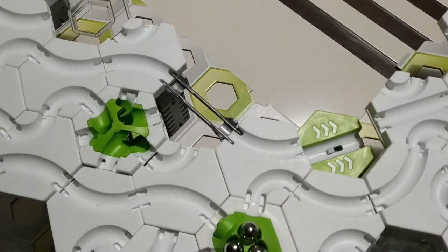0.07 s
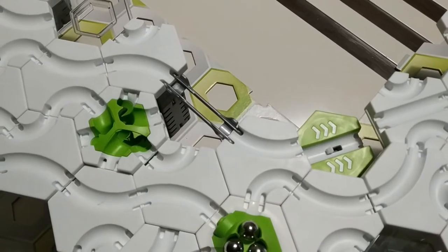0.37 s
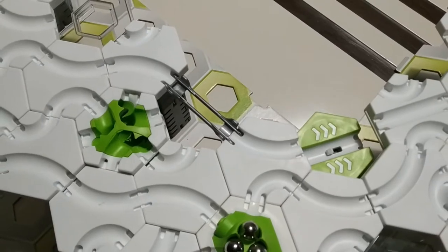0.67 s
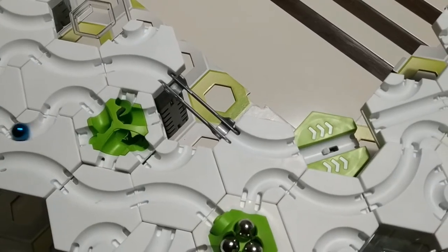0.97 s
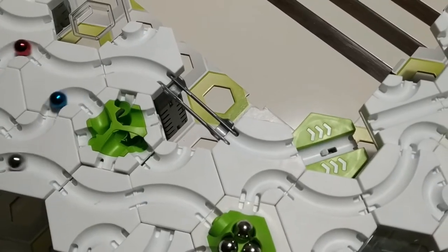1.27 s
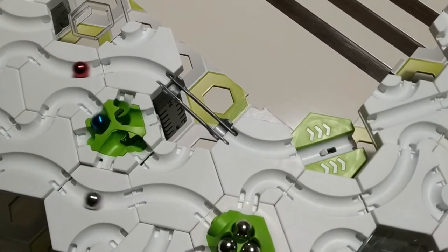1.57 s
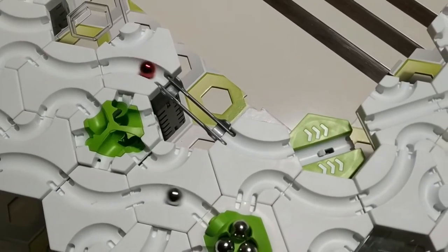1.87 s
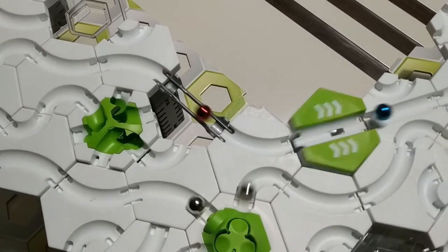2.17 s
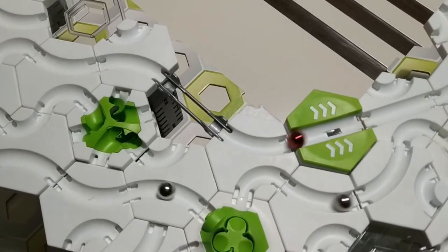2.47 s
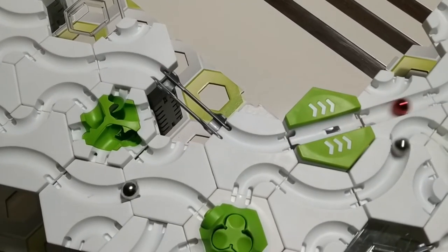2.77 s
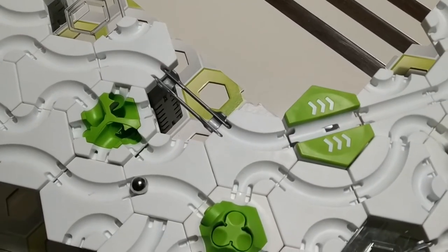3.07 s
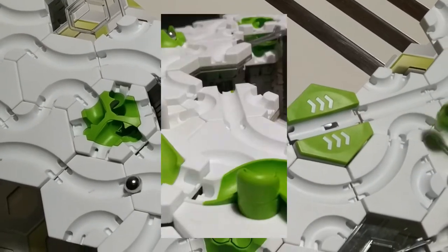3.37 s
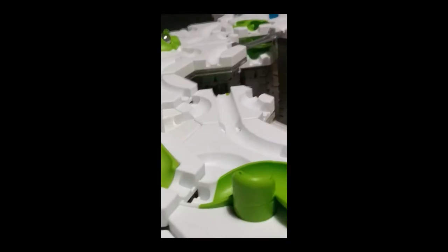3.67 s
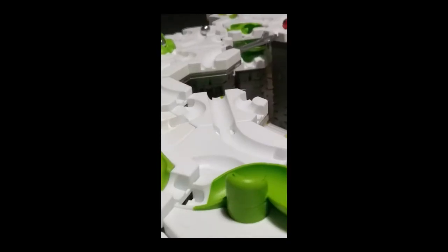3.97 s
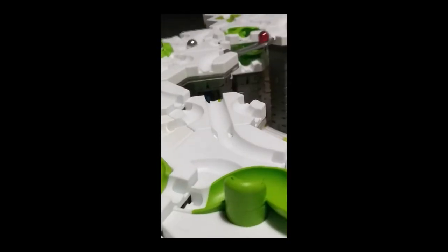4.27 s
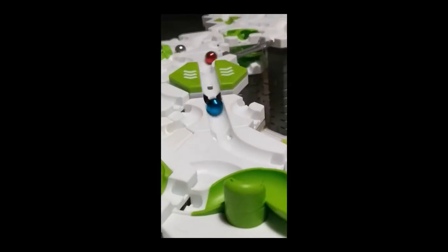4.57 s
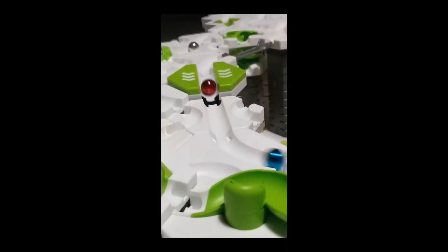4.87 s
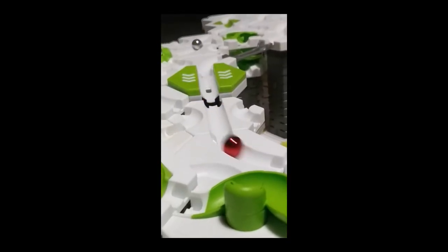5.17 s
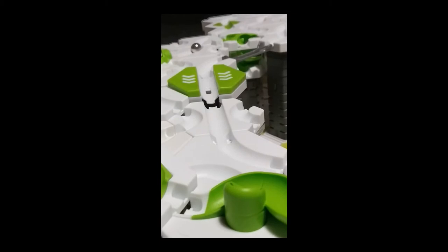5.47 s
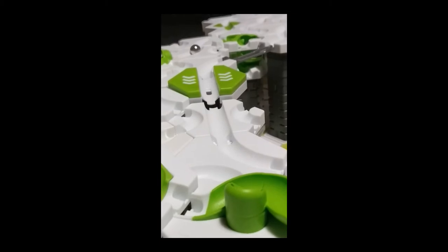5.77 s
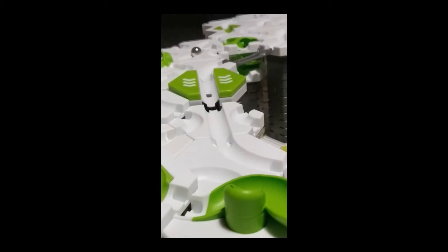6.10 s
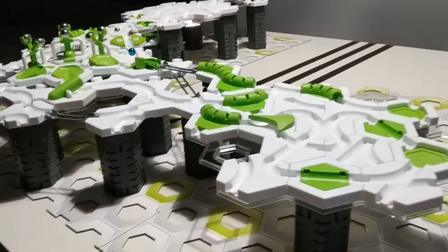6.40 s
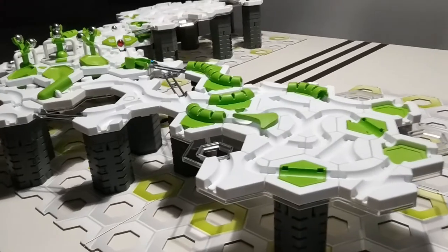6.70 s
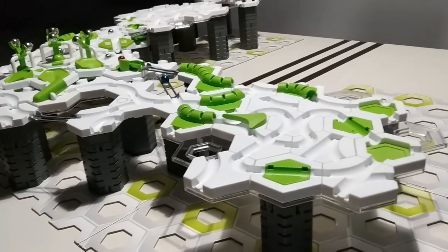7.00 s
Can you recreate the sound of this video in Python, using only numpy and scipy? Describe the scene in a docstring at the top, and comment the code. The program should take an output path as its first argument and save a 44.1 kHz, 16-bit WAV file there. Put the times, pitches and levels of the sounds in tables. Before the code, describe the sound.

In a small, quiet room, marbles roll along plastic grooves near the microphone, rumbling softly and clicking across joints and switches. The clatter thickens as one rings briefly down metal rails and others knock onto lower tiles. Then the sound suddenly turns softer and drier: a marble snaps against a magnetic launcher, jolting the table, and irregular ticks carry on over faint rolling.

```python
"""A table in a quiet room, where steel marbles run through a plastic toy track. They rumble in the grooves,
click over tile joints and switches, and thud down onto lower tiles; one chatters down a pair of metal rails and
sets them ringing. At 3.46 s the scene changes to a quieter stretch of the track, where a marble jolts a
magnetic launcher and the table hums."""
import sys
import numpy as np
from scipy import signal
from scipy.fft import rfft, irfft
from scipy.io import wavfile

SR = 44100
rng = np.random.default_rng(int(sys.argv[2]) if len(sys.argv) > 2 else 0)


def dump(signal):
    """Clip the signal to [-1, 1] and save it as 16-bit WAV at the path in sys.argv[1]."""
    limited = np.clip(np.atleast_2d(signal).T, -1, 1)
    pcm = np.round(limited * 32767).astype(np.int16)
    wavfile.write(sys.argv[1], SR, pcm)


N = 310464
TIME = np.arange(N) / SR
FREQ = np.fft.rfftfreq(N, 1 / SR) + 1e-3
LN_60DB = np.log(1000)
QUIET_START_S = 3.462

# resonances of the plastic tiles: pitch_hz, width_hz, level_db
TILE_MODES = [(650, 660, 3.5), (1460, 490, 4), (2440, 1300, 2), (3540, 2100, 7.5), (4740, 4500, -3),
              (6210, 2450, 11), (7720, 2500, -3.5), (7600, 1400, 6), (10400, 750, -7.5)]


def undb(db):
    """Decibels to gain."""
    return 10 ** (np.asarray(db) / 20)


def unit(x):
    """Scale to rms 1."""
    return x / np.sqrt(np.mean(x ** 2))


def pan(db):
    """Channel gains that put the left db above the right."""
    return undb([[db / 2], [-db / 2]])


def curve(rows, column=1):
    """Glide through one column of rows that begin with time_s."""
    columns = np.transpose(rows)
    return np.interp(TIME, columns[0], columns[column])


def shaped(x, gain):
    """Filter by a gain for each frequency."""
    return irfft(rfft(x) * gain, N)


def slope(points):
    """EQ curve through (freq_hz, level_db) points."""
    hz, db = np.transpose(points)
    return undb(np.interp(np.log(FREQ), np.log(hz), db))


def resonances(modes):
    """Summed response of damped (pitch_hz, width_hz, level_db) modes."""
    return sum(undb(db) / (1 + 1j * (FREQ ** 2 - hz ** 2) / (FREQ * width)) for hz, width, db in modes)


def ringing(modes, t):
    """Fading (pitch_hz, level_db, t60_s) modes, t seconds after a blow."""
    return sum(undb(db) * np.sin(2 * np.pi * hz * t) * np.exp(-LN_60DB * t / t60)
               for hz, db, t60 in modes)


def walk(rate_hz):
    """Smooth random wander with a spread of 1."""
    return unit(shaped(rng.standard_normal(N), np.exp(-(FREQ / rate_hz) ** 2)))


def stereo_noise(alike_hz):
    """Left and right noise, alike in the bass and unrelated in the treble."""
    mid, side = rng.standard_normal((2, N))
    angle = np.pi / 4 * FREQ / (FREQ + alike_hz)
    mid, side = shaped(mid, np.cos(angle)), shaped(side, np.sin(angle))
    return np.array([mid + side, mid - side])


def noise_bed(spectrum, level_db, alike_hz):
    """Steady stereo noise with the given colour and rms level."""
    return undb(level_db) * unit(shaped(stereo_noise(alike_hz), slope(spectrum)))


def drone(hz, width_hz, evenness=0):
    """A gliding resonance, driven at random; an even drive steadies its level."""
    phase = 2 * np.pi * np.cumsum(hz) / SR
    drive = walk(width_hz) + 1j * walk(width_hz)
    return unit(np.real(drive * np.exp(1j * phase)) / np.abs(drive) ** evenness)


def room_air():
    """The faint, dark hiss of the room's air."""
    # colour of the air: freq_hz, level_db
    spectrum = [(20, 1), (100, 0), (600, 0), (2000, -19.5), (8000, -25.5), (16000, -46)]
    return noise_bed(spectrum, level_db=-68, alike_hz=600)


def room_hum():
    """The room's deep, unpitched hum."""
    # colour of the hum: freq_hz, level_db
    spectrum = [(12, 0), (30, 2.5), (90, -13), (800, -72)]
    return noise_bed(spectrum, level_db=-56, alike_hz=60)


def room_echoes(x, wet_db, decay_scale=1, build_s=0.0012):
    """Small-room reverb: the treble dies first, and every place on the track has its own echoes."""
    # decay of the room: freq_hz, t60_s
    decays = [(200, 0.63), (700, 0.46), (2000, 0.49), (5000, 0.38), (9000, 0.26), (14000, 0.16)]
    hz, t60s = np.transpose(decays)
    size, block = SR * 2 // 3, SR // 6
    t = TIME[:size]
    noise = rng.standard_normal((2, N))
    bands = [shaped(noise, np.interp(np.log(FREQ), np.log(hz), share)) for share in np.eye(len(hz))]
    build = 1 - np.exp(-(t / build_s) ** 2)
    fades = [build * np.exp(-LN_60DB * t / (t60 * decay_scale)) for t60 in t60s]
    out = np.zeros((2, N + SR))
    for start in range(0, N, block):
        place = rng.integers(N - size)
        response = unit(sum(band[:, place:place + size] * fade for band, fade in zip(bands, fades)))
        echoes = signal.fftconvolve(x[:, start:start + block], response, axes=1)
        out[:, start:start + echoes.shape[1]] += echoes
    return out[:, :N] * undb(wet_db) / np.sqrt(size)


def table_bounce(x, share=0.43, delay_s=0.0013, roam=0.3045, roam_hz=3):
    """The table top mirrors the sound; the detour changes as the marbles travel, shifting the colour."""
    mirrored = np.zeros_like(x)
    for side, channel in enumerate(x):
        detour_s = delay_s * np.exp(roam * walk(roam_hz))
        oversampled = signal.resample_poly(channel, 4, 1)
        mirrored[side] = oversampled[np.maximum(4 * SR * (TIME - detour_s), 0).astype(int)]
    return (x + share * mirrored) / np.hypot(1, share)


def rolling_rumble(wander=0.05, wobble_db=2.0):
    """Rolling shakes the table and the hollow tiles, whose resonances shift as the marbles move on."""
    # strength of the rolling: time_s, boom_db, rumble_db
    levels = [(0, -51.5, -44.5), (0.84, -52.5, -41.5), (1.15, -50.5, -48.5), (1.55, -52.5, -50),
              (1.76, -44, -45.5), (2.0, -50, -47.5), (2.26, -44.5, -40.5), (2.5, -50, -39),
              (3.409, -45.5, -46), (3.529, -74, -69), (3.939, -61.5, -67.5), (4.13, -57, -59),
              (4.38, -64.5, -67), (4.85, -69.5, -56.5), (5.35, -63.5, -58), (5.8, -58.5, -57),
              (6.3, -63, -61), (7.001, -67, -61)]
    # colour of the table's boom: freq_hz, level_db
    boom_spectrum = [(50, -32), (85, -4.5), (100, -11), (130, 3), (170, -20.5), (210, 5.5), (300, -1),
                     (450, -7.5), (900, -42)]
    # the table's resonance: time_s, pitch_hz
    table_pitch = [(0.9, 168.5), (1.6, 135.4), (2.3, 127.3), (3.2, 205), (4.0, 131.2), (5.3, 190.3),
                   (6.2, 215.7), (7.0, 150)]
    # colour of the groove's rumble: freq_hz, level_db
    rumble_spectrum = [(220, -38.5), (400, -6.5), (580, -0.5), (780, -1.5), (1100, -9.5), (1500, -15),
                       (2250, -13.5), (3200, -34), (9000, -42.5)]
    # the hollow tiles' resonance: time_s, pitch_hz, relative_db
    hollow = [(0, 688.5, -1), (.26, 795, -5.5), (0.421, 630, -2), (0.701, 704, -9.5), (0.889, 569, -5),
              (1.5, 679, -14), (3.0, 663.7, -10), (4.0, 519.7, -7), (4.75, 698.7, -6.5), (5.4, 572, -7),
              (6.1, 479, -6.5), (6.999, 649, -25)]
    table = noise_bed(boom_spectrum, level_db=-3, alike_hz=800)
    table += undb(-4) * drone(curve(table_pitch), width_hz=28)
    groove_hz = curve(hollow) * np.exp(wander * walk(6))
    groove = undb(curve(hollow, 2)) * drone(groove_hz, width_hz=75, evenness=0.7)
    tiles = groove + noise_bed(rumble_spectrum, level_db=-2, alike_hz=620)
    boom_db = curve(levels)
    rumble_db = curve(levels, 2) + wobble_db * walk(25)
    return undb(boom_db) * table + undb(rumble_db) * tiles


def groove_grit(bumps_per_s=320, bump_s=0.0038, steady=0.85, swell_db=5.5, spurt_db=2.5, ceiling=1.4):
    """Tiny bumps keep the tiles scraping; each mode swells and fades as the contact point travels."""
    # grit under the marbles: time_s, level_db
    levels = [(0, -64), (0.8, -55), (1.35, -67.5), (1.68, -48), (1.72, -33), (1.92, -48), (2.2, -29),
              (2.3, -35.5), (2.47, -49.5), (2.68, -39.5), (2.96, -51.5), (3.15, -35), (3.42, -41),
              (3.52, -71), (3.92, -76), (4.04, -47), (4.33, -53.5), (4.54, -41), (4.72, -52.5), (5.35, -72),
              (5.54, -42), (5.68, -55), (5.9, -53), (6.0, -56.5), (6.3, -59), (6.46, -41.5), (6.7, -56.5),
              (7.0, -49)]
    strikes = rng.random(N) < bumps_per_s / SR
    bump_db = 2.5 * np.minimum(rng.exponential(size=N), 3)
    bumps = signal.lfilter([1], [1, -np.exp(-1 / (bump_s * SR))], strikes * undb(bump_db))
    scrape = (steady + unit(bumps)) * stereo_noise(500)
    # the ceiling keeps swells and spurts below the clicks
    crackle = sum(shaped(scrape, resonances([mode])) * undb(swell_db * np.minimum(walk(20), ceiling))
                  for mode in TILE_MODES)
    spurts = spurt_db * np.minimum(walk(30), ceiling)
    return unit(crackle) * undb(curve(levels) + 1 + spurts) * pan(3)


def drop_thuds():
    """A marble drops onto a lower tile and its weight knocks dully on the table."""
    # drops down a step: start_s, level_db, pitch_ratio
    drops = [(1.735, -32, 1.17), (2.266, -33, 1.5), (2.59, -31.5, 1.3), (2.749, -32, 1.9),
             (2.888, -35, 1.4), (3.119, -30, 1.284), (3.662, -54, 0.98), (3.82, -53.5, 1.04),
             (3.971, -43.5, 0.92)]
    # the knocked table's modes: pitch_hz, level_db, t60_s
    modes = [(138, -9.5, 0.16), (288, -5, 0.053), (560, 4, 0.038), (810, 2.5, 0.019), (1180, -4.5, 0.0214)]
    # a higher thud also dies sooner
    return sum(undb(db) * ringing(modes, ratio * np.maximum(TIME - start_s, 0))
               for start_s, db, ratio in drops)


def launcher_jolt(start_s=4.613, push_s=0.00018, puff_db=-30, settle_s=0.044):
    """The launcher's recoil sends a puff of pressure that swings back once; the table hums on."""
    # the jolted table's mode: pitch_hz, level_db, t60_s
    modes = [(168, -45, 0.15)]
    t = np.maximum(TIME - start_s, 0)
    puff = undb(puff_db) * (1 - t / settle_s) * np.exp(-t / settle_s)
    return ringing(modes, t) - puff * (1 - np.exp(-t / push_s))


def rail_run(chatter_db=3):
    """A marble chatters down two steel rods and sets them ringing."""
    # modes of the rails: pitch_hz, width_hz, level_db
    modes = [(3820, 100, -8.5), (4620, 45, -2), (5100, 50, -5), (6170, 50, -14), (6350, 80, 1.5),
             (7520, 62, 2.5), (7715, 35, -2.5), (9700, 83, 0)]
    # swell as the marble passes: time_s, level_db
    swell = [(2.145, -40), (2.175, -27), (2.21, -20), (2.243, -28), (2.27, -47)]
    chatter = stereo_noise(2000) * undb(chatter_db * walk(150))
    ring = unit(shaped(chatter, resonances(modes)))
    level_db = np.interp(TIME, *np.transpose(swell), left=-np.inf, right=-np.inf)
    return ring * undb(level_db) * pan(-2)


def strike_envelope(t, t60, hop_s, tick_s=0.00031, rise_s=0.00083, rattle_t60=0.055):
    """A hard tick and a short ring, a faint rattle of nearby tiles, and a softer landing after one hop."""
    blow = 2.7 * np.exp(-t / tick_s) + np.exp(-LN_60DB * t / t60)
    blow *= 1 - np.exp(-t / rise_s)
    rattle = undb(-26) * np.exp(-LN_60DB * t / rattle_t60)
    landing = undb(-13) * np.interp(t - hop_s, t, blow, left=0)
    return np.hypot(blow + rattle, landing)


def struck_spot(hit, hz, emphasis):
    """The struck spot favours the modes near hz; each channel's first 10 ms is scaled to rms 1."""
    width_hz = 260 + 0.05 * hz
    hit = hit + emphasis * signal.lfilter(*signal.iirpeak(hz, hz / width_hz, fs=SR), hit)
    return hit / np.sqrt(np.mean(hit[:, :SR // 100] ** 2, axis=1, keepdims=True))


def marble_clicks(typical_hop_s=0.011, lag_s=0.00028, knock_range_hz=(500, 1100)):
    """Steel strikes plastic: the tile's crowded modes give a hollow knock, a clack and a bright tick."""
    # marble strikes: start_s, tick_db, clack_over_tick_db, t60_s, clack_hz, tick_hz
    strikes = [(0.2446, -53, 2, 0.02, 2010, 6320), (0.289, -51, 4.5, 0.018, 2300, 8700),
               (0.518, -47, -3.5, 0.04, 2210, 8810), (0.5378, -45, 1.5, 0.021, 2210, 6780),
               (0.5606, -36, -2.5, 0.015, 2280, 6530), (0.7299, -24.5, -6.5, 0.025, 4630, 7400),
               (0.787, -32.5, -3.5, 0.041, 2220, 8800), (0.8716, -43, -4, 0.019, 2210, 8800),
               (0.9181, -44, 0.5, 0.05, 2180, 9950), (0.945, -39.5, 0, 0.022, 2200, 7850),
               (0.959, -35.5, -4, 0.036, 2550, 8460), (0.9923, -35.5, -2.5, 0.014, 3370, 8430),
               (1.017, -33.5, -4, 0.024, 2870, 8210), (1.1522, -49, 4, 0.04, 3560, 6010),
               (1.2062, -47.5, 0, 0.016, 2240, 8600), (1.3848, -62, 7.5, 0.022, 2180, 8350),
               (1.531, -20.5, -6, 0.012, 4200, 10900), (1.6931, -21, -16, 0.061, 4230, 8510),
               (1.716, -28, -7.5, 0.05, 4170, 11100), (1.7322, -31, 0.5, 0.035, 4430, 11100),
               (1.7893, -37, 1, 0.02, 2257, 10610), (1.8025, -22.5, -6, 0.036, 2240, 6360),
               (1.9487, -36.5, -8, 0.04, 3300, 10000), (2.029, -32.5, -11, 0.032, 3740, 10000),
               (2.041, -35.5, -9, 0.022, 4630, 9670), (2.0822, -23.5, -13.5, 0.055, 4540, 7350),
               (2.1678, -29, 0, 0.11, 4490, 9700), (2.1933, -20, -26, 0.014, 4460, 9200),
               (2.2086, -26.5, -2, 0.075, 4500, 6380), (2.232, -33, -0.5, 0.025, 4700, 6310),
               (2.2638, -30, 2.5, 0.044, 2490, 8980), (2.272, -21.5, -9.5, 0.022, 4540, 8870),
               (2.3781, -34.5, 0, 0.03, 4180, 9700), (2.5062, -34, -7.5, 0.07, 3800, 10800),
               (2.5858, -20.5, -5.5, 0.027, 3790, 8760), (2.6048, -22, -3.5, 0.044, 2900, 10400),
               (2.7474, -26, -4, 0.046, 2390, 8800), (2.8233, -36, -5, 0.18, 4860, 7550),
               (2.8802, -28.5, -1.5, 0.031, 3260, 8550), (2.8876, -24.5, -4.5, 0.05, 2440, 8250),
               (3.0015, -25.5, -5, 0.051, 4070, 9260), (3.0278, -23.5, -6, 0.015, 4026, 9000),
               (3.0608, -31.5, -10, 0.035, 4800, 9300), (3.1176, -20.5, -4.5, 0.037, 4100, 7100),
               (3.1304, -27, -16.5, 0.029, 4383, 7080), (3.157, -27, -7, 0.018, 3740, 10640),
               (3.1948, -26.5, -8.5, 0.016, 3930, 8100), (3.2313, -32, -11, 0.011, 3730, 6920),
               (3.3193, -31, -7.5, 0.065, 3930, 6120), (3.3325, -21.5, -9.5, 0.0099, 3230, 6200),
               (3.383, -24, -8, 0.02, 3960, 8450), (3.4008, -29, -9, 0.0071, 3984, 8200),
               (3.413, -27.5, -12.5, 0.03, 4070, 8100), (3.4236, -24, -7.5, 0.015, 3960, 8120),
               (3.562, -63, 3.5, 0.094, 2870, 8350), (3.6204, -56.5, -5.5, 0.046, 2530, 8530),
               (3.7048, -58.5, -8.5, 0.013, 2090, 10270), (3.943, -32.5, -4.5, 0.044, 3990, 10720),
               (3.9691, -36.5, -5.5, 0.027, 4300, 7280), (4.031, -39, -8.5, 0.25, 4700, 8600),
               (4.145, -32.5, -9, 0.021, 2747, 10800), (4.3767, -41, -14, 0.1, 2567, 8500),
               (4.4338, -34, -25, 0.035, 3375, 9300), (4.47, -33, -21, 0.018, 4600, 8950),
               (4.525, -34, -10, 0.045, 2600, 8200), (4.5393, -28, -16, 0.057, 4700, 9200),
               (4.5796, -34.5, -14, 0.03, 4770, 8150), (4.6126, -15.5, -9.5, 0.027, 2400, 7500),
               (4.62, -25.5, -20, 0.0094, 3830, 8650), (4.9662, -25, -2, 0.033, 3380, 10990),
               (4.9853, -33.5, -10, 0.02, 2700, 9070), (4.994, -34, -1, 0.044, 2480, 9250),
               (5.1178, -40, -3.5, 0.03, 5170, 7710), (5.126, -33, -8.5, 0.03, 4500, 7800),
               (5.1674, -54, 8, 0.02, 2620, 7720), (5.1905, -28.5, -12.5, 0.018, 4700, 7700),
               (5.2445, -42.5, -4, 0.23, 3950, 9120), (5.361, -22.5, -3.5, 0.036, 4700, 9100),
               (5.3737, -34.5, -3.5, 0.0093, 3250, 7840), (5.46, -35.5, -6.5, 0.22, 4760, 7350),
               (5.502, -38, -7, 0.05, 3640, 7600), (5.5655, -34.5, -1.5, 0.043, 4753, 11200),
               (5.7192, -26, -9.5, 0.02, 3360, 9420), (5.7313, -43.5, 3.5, 0.015, 3246, 7470),
               (5.7503, -42, -1, 0.016, 3540, 7340), (5.8213, -39.5, -5.0, 0.017, 2537, 7600),
               (5.84, -35, -5.5, 0.049, 2720, 7740), (5.8538, -42, -2, 0.01, 3050, 7640),
               (5.883, -38, 0.5, 0.05, 2430, 7640), (6.023, -49.5, 4.5, 0.05, 5430, 5640),
               (6.0696, -28.5, -7, 0.027, 3260, 9390), (6.0821, -46, 3, 0.024, 3170, 8050),
               (6.101, -40, -0.5, 0.016, 3280, 7350), (6.1885, -44.5, -3.5, 0.013, 3160, 7480),
               (6.2, -38.5, -2.5, 0.02, 3140, 7460), (6.2594, -43, -6, 0.031, 4740, 8110),
               (6.357, -45.5, -1, 0.032, 5000, 9300), (6.44, -29.5, -3.5, 0.081, 4320, 8800),
               (6.613, -43.5, 4.5, 0.078, 2945, 10210), (6.7731, -36.5, 0, 0.071, 4500, 8740),
               (6.874, -56.5, 9.5, 0.059, 2850, 9700)]
    # knock, clack and tick bands: low_hz, high_hz
    band_edges = [(350, 1800), (1800, 5500), (5500, 16000)]
    # the marbles' place across the track: time_s, left_over_right_db
    positions = [(1.5, 0.5), (2.25, 8.5), (2.6, 0.5), (2.8, 6.5), (3.43, 9), (3.6, 1.5), (5.4, 4),
                 (5.9, 8.5), (6.5, 0)]
    out, size = np.zeros((2, N + SR)), SR // 7
    t = TIME[:size]
    tile = shaped(rng.standard_normal(N) + 1.18 * stereo_noise(300), resonances(TILE_MODES))
    bands = [signal.sosfilt(signal.butter(4, edges, "band", fs=SR, output="sos"), tile)
             for edges in band_edges]
    across_db = curve(positions)
    for start_s, tick_db, body_db, t60, clack_hz, tick_hz in strikes:
        flight, place, side = rng.random(3)
        start = int(start_s * SR)
        side_db = across_db[start]
        hop_s = typical_hop_s * (0.5 + flight)
        # from spots far to the side, one channel's ring runs slightly ahead
        left = start + int(lag_s * SR * (2 * side - 1) * (side_db / 10) ** 2)
        quiet = start_s > QUIET_START_S
        # the knock grows with body and force, and is weaker in the quiet stretch
        knock_db = -2.5 + 1.65 * body_db + 0.0762 * (tick_db + 30) - 11.5 * quiet
        knock_hz = np.interp(place, (0, 1), knock_range_hz)
        layers = [(knock_hz, 0.82, knock_db, 0, 1.345 * t60),
                  (clack_hz, 1.8 if quiet else 2.3, body_db, 0.44 * side_db - 4, t60),
                  (tick_hz, 1.1, 0, side_db, t60)]
        for band, (hz, emphasis, relative_db, pan_db, ring_s) in zip(bands, layers):
            ring = np.array([band[0, left:left + size], band[1, start:start + size]])
            hit = struck_spot(ring * strike_envelope(t, ring_s, hop_s), hz, emphasis)
            out[:, start:start + size] += hit * undb(tick_db + relative_db) * unit(pan(pan_db))
    return out[:, :N]


def scene(crossfade_s=0.011):
    """A busy stretch of track, then a quieter, duller and drier one in the same room."""
    # softened treble of the quiet stretch: freq_hz, level_db
    quiet_eq = [(2000, 0), (4000, -4.5), (9000, -1), (15500, -9)]
    track = table_bounce(marble_clicks() + groove_grit()) + rail_run()
    # at the scene change the busy stretch ends, and its echoes and the room's hum end with it
    busy_gate = np.clip((QUIET_START_S - TIME) / crossfade_s + 0.5, 0, 1)
    busy = busy_gate * (track + room_hum() + room_echoes(track, wet_db=-6.5))
    quiet = shaped(track * (1 - busy_gate), slope(quiet_eq))
    air = room_air()
    quiet_send = quiet * (TIME > QUIET_START_S + 0.04)
    quiet += room_echoes(quiet_send, wet_db=-10, decay_scale=0.97)
    return air + rolling_rumble() + drop_thuds() + launcher_jolt() + busy + quiet


def record(dry, top_hz=15900):
    """Colour the left and right treble differently and take off the very top."""
    # stereo tilt: freq_hz, left_over_right_db
    balance = [(1000, 0.5), (3000, 1.5), (6300, -1), (8000, 2.5), (9200, 10), (12000, 8), (14500, -4.5)]
    tilt = np.sqrt(slope(balance))
    coloured = shaped(dry, np.array([tilt, 1 / tilt]))
    return signal.sosfilt(signal.ellip(8, 0.2, 70, top_hz, fs=SR, output="sos"), coloured)


dry = scene()
out = record(dry)
dump(out)
```